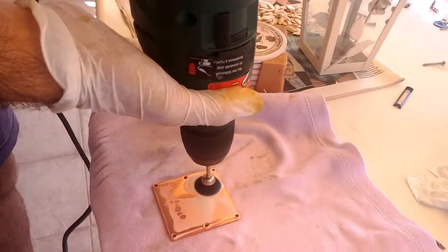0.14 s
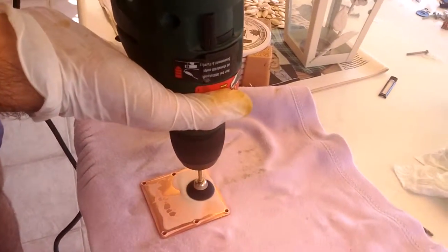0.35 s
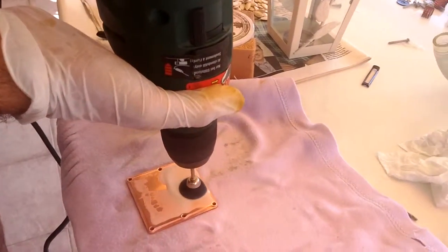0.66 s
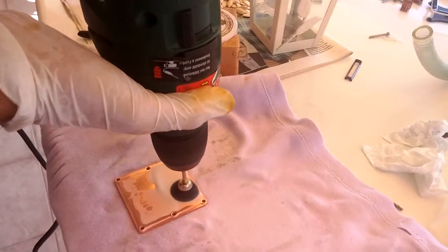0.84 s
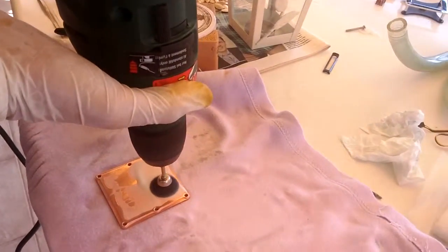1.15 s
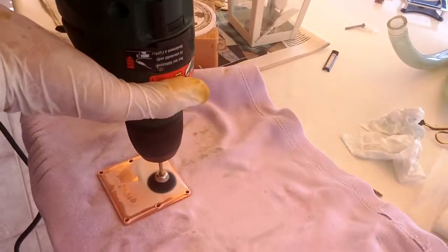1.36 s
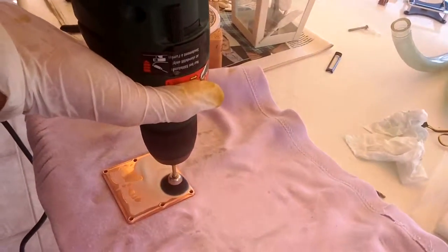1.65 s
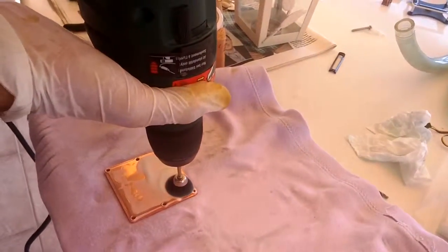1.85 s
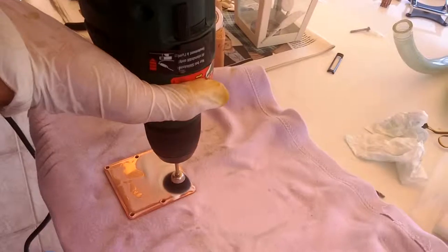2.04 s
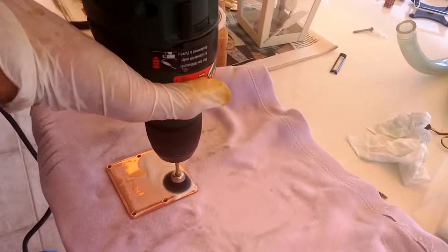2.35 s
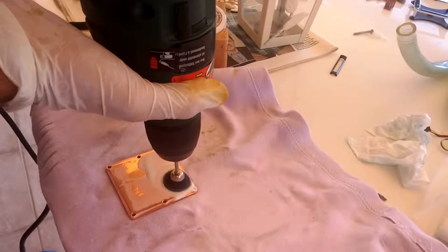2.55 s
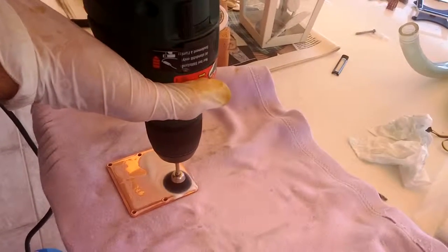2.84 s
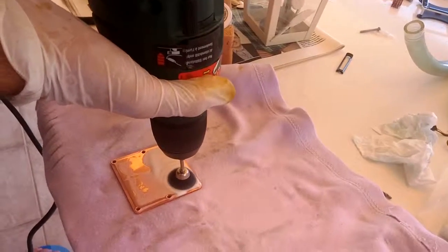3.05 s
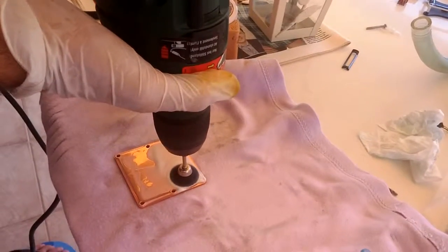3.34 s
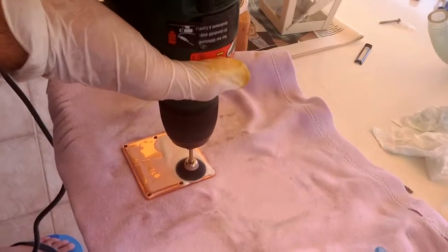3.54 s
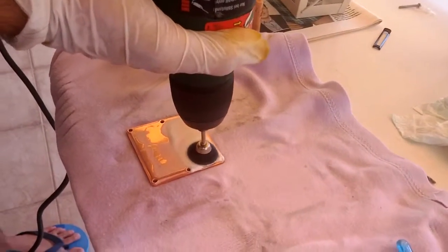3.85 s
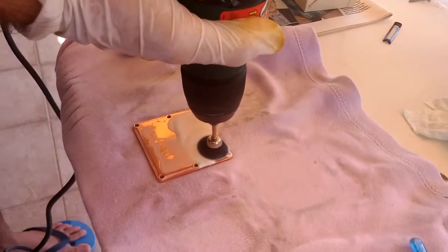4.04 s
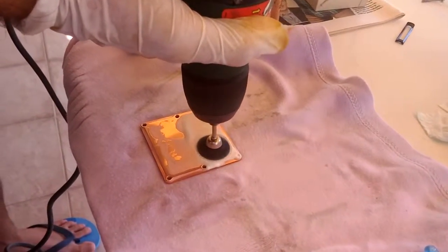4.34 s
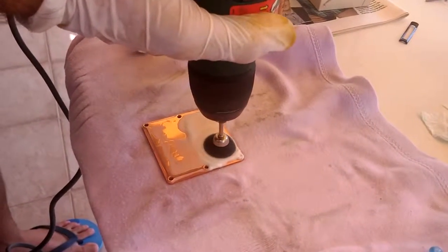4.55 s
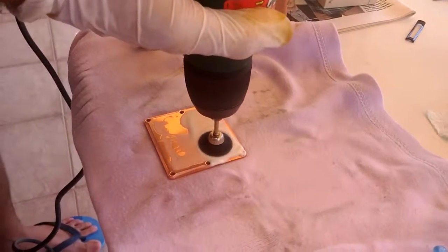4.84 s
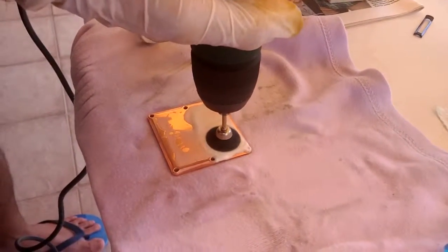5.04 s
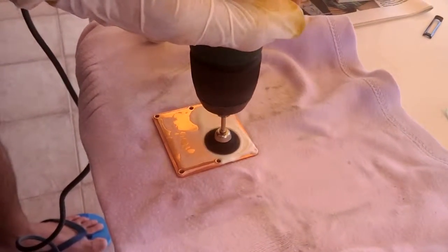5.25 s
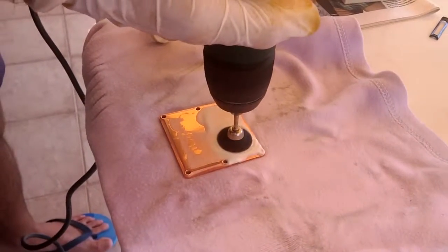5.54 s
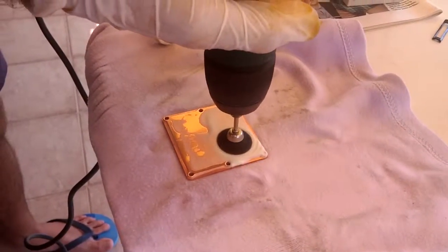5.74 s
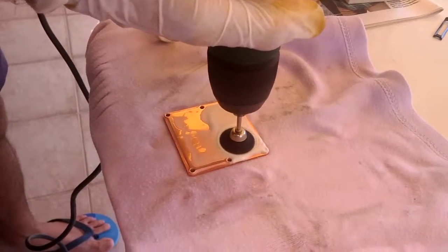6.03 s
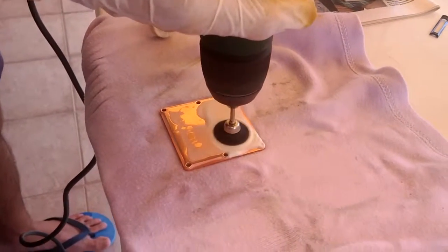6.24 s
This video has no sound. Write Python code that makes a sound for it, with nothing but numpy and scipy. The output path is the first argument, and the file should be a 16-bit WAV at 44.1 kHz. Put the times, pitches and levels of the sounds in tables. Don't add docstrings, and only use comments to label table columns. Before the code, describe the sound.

A corded drill grinds a metal plate close up, loud, then softer, then loud again, over hissing motor air, low thuds and a rising whistle.

```python
import sys
import numpy as np
from scipy import signal
from scipy.fft import rfft, irfft, next_fast_len
from scipy.io import wavfile
from scipy.ndimage import uniform_filter1d, map_coordinates

SR = 44100
rng = np.random.default_rng(int(sys.argv[2]) if len(sys.argv) > 2 else 0)


def convert_level_to_amplitude(level_db):
    exponent = np.asarray(level_db, float) / 20
    return 10 ** exponent


def generate_wav(sig):
    pcm = np.round(np.clip(np.atleast_2d(sig).T, -1, 1) * 32767).astype(np.int16)
    wavfile.write(sys.argv[1], SR, pcm)


N = 281799
HZ = np.fft.rfftfreq(next_fast_len(N + 8192), 1 / SR)

# (time [s], grinding [dB], fan hiss [dB], mains hum [dB], table thud [dB])
WORK_LEVELS = [(0.0, -12, -29, -50.5, -36), (0.03, -12, -31, -50, -52), (0.16, -11.5, -30.5, -59, -51),
               (0.19, -13, -30, -53, -45), (0.25, -12.5, -30, -61, -52), (0.37, -12, -30, -53, -52),
               (0.59, -12, -30, -67, -46), (0.64, -12, -30, -60, -51), (0.82, -11, -30.5, -59, -45),
               (0.93, -15.5, -30.5, -59, -55), (1.1, -24, -31.5, -61, -55), (1.39, -23.5, -31.5, -59, -51),
               (1.44, -25, -32, -74, -52), (1.55, -23.5, -31, -52, -54), (1.6, -23.5, -28.5, -70, -55),
               (1.65, -21, -29, -56, -53), (2.01, -19.5, -26.5, -45, -49), (2.08, -20, -25.5, -58, -48),
               (2.17, -18.5, -26, -52, -41), (2.3, -19, -26, -50, -48), (2.49, -15.5, -24.5, -41, -46),
               (2.54, -15, -25, -51, -47), (2.6, -16, -25, -44, -43), (2.92, -15, -25, -44, -43.5),
               (3.22, -15.5, -24, -61, -40.5), (3.27, -16, -25, -46, -44), (3.44, -15, -24.5, -52, -43),
               (3.52, -15, -24.5, -44, -42), (3.61, -15, -24.5, -51, -51), (3.67, -15.5, -24, -41, -44),
               (3.72, -15, -24, -51, -43), (3.83, -14, -24.5, -57, -42), (4.04, -11.5, -24, -46, -45.5),
               (4.13, -12, -24.5, -54, -40), (4.18, -13, -23, -51, -33), (4.22, -12, -24.5, -47, -35),
               (4.36, -12, -24, -50, -43), (4.48, -12, -24.5, -50, -38), (4.52, -13, -22.5, -53, -37),
               (4.55, -12.5, -24.5, -49, -42), (4.66, -12, -24, -54.5, -43), (4.96, -11, -23.5, -49, -34.5),
               (5.07, -10, -23.5, -40, -44), (5.18, -12, -24, -58, -38), (5.23, -11, -23, -64, -37),
               (5.29, -10.5, -23.5, -53, -39), (5.36, -11, -23.5, -55, -48), (5.39, -10.5, -24, -50, -39),
               (5.48, -12, -25, -42, -41), (5.52, -11, -25.5, -54, -42), (5.62, -12, -25.5, -56, -43),
               (5.66, -12, -26, -64, -40), (5.84, -11, -26, -48, -46), (5.89, -12.5, -26, -51, -44),
               (6.03, -12.5, -26.5, -47, -40), (6.12, -12.5, -26, -61, -43), (6.18, -10.5, -26, -41, -42),
               (6.25, -12.5, -26, -50, -46), (6.3, -12.5, -26.5, -64, -42), (6.34, -12, -26.5, -51, -37),
               (6.39, -12.5, -26, -52, -42)]
# (time [s], place [0 corner, 1 middle, 2 pressed, 3 far edge], housing turned away [0-1])
DISC_PLACE = [(0, 0, 0.81), (.85, 0, 0.28), (1.1, 0.45, 0), (1.8, 1, 0.068), (3.7, 1.2, 0.21),
              (4.0, 2.5, 0.49), (4.9, 2.5, 0.48), (5.3, 3, 0.66), (5.7, 3, 1), (6.39, 3, 0.92)]


def spectrum(x):
    return rfft(x, 2 * len(HZ) - 2)


def waveform(bins):
    return irfft(bins)[..., :N]


def unit(x):
    mono = np.atleast_2d(x).mean(axis=0)
    return x / np.sqrt(np.mean(mono ** 2))


def along(rows):
    f, *cols = np.transpose(rows)
    return np.array([np.interp(np.log(HZ + 1), np.log(f + 1), c) for c in cols])


def curves(rows):
    s, *cols = np.transpose(rows)
    return [np.interp(np.arange(N) / SR, s, c) for c in cols]


def wobble(rate_hz):
    knots = rng.standard_normal(int(N * rate_hz / SR) + 4)
    return map_coordinates(knots, [np.arange(N) * rate_hz / SR])


def port_noise(patchy_db):
    # (frequency [Hz], likeness [0-1], lead of the right port [rad])
    ports = [(60, 0.84, 0.01), (250, 0.9, -0.5), (470, 0.8, -0.9), (870, 1, 0.85), (1244, 0.62, -1.5),
             (1560, 0.92, 0.6), (1970, 0.8, 1.0), (2800, 0.81, 3.5), (3540, 0.31, 3.0), (4240, 0.53, 3),
             (4800, .15, 4.5), (5640, 0.55, 5.5), (8540, 0.27, 4), (11100, 0.13, 6), (15500, 0.5, 0.5)]
    z = signal.stft(rng.standard_normal((2, N)), nperseg=512)[2]
    field = rng.standard_normal(z.shape[1:])
    field = uniform_filter1d(field, size=4, axis=0)
    field = uniform_filter1d(field, size=6, axis=1)
    patchy = z * convert_level_to_amplitude(patchy_db * field / field.std())
    a, b = spectrum(signal.istft(patchy, nperseg=512)[1][:, :N])
    alike, lead_rad = along(ports)
    turn = np.arccos(np.clip(alike, 0, 1)) / 2
    mid, side = np.cos(turn) * a, np.sin(turn) * b
    left = (mid + side) * np.exp(-0.5j * lead_rad)
    right = (mid - side) * np.exp(0.5j * lead_rad)
    return np.array([left, right])


def morph(noise, colours, edge, place):
    voices = [unit(waveform(noise * convert_level_to_amplitude(along(c)) * edge)) for c in colours]
    return sum(np.clip(1 - abs(place - k), 0, 1) * v for k, v in enumerate(voices))


def plate():
    # (frequency [Hz], left [dB], right [dB])
    corner = [(90, -34, -43), (330, -24.5, -34), (714, -22, -28), (847, -16, -21.5), (1056, -6.5, -6),
              (1270, 0.5, -10), (1700, -3, -14), (2070, -9.5, -12.5), (2440, -10, -20), (2660, -14, -19),
              (3300, -24.5, -18.5), (3830, -26, -25), (4750, -31, -19.5), (6100, -18.5, -19)]
    # (frequency [Hz], left [dB], right [dB])
    middle = [(90, -26, -22), (320, -16.5, -22), (746, -11, -20.5), (850, -8, -15.5), (1014, -0.5, -4),
              (1460, -2, -15), (1700, 0, 0), (2050, -0.5, -10), (2330, -3, -16), (2680, -10, -8),
              (3080, -15.5, -17), (4070, -23, -17.5), (4750, -16.5, -19.5), (6000, -16.5, -20)]
    # (frequency [Hz], left [dB], right [dB])
    pressed = [(90, -18, -23), (318, -19, -17), (690, -12, -21), (840, -9.5, -14.5), (1070, -1.5, -4.5),
               (1450, -8.5, -17), (1700, -0.5, 0.5), (1990, -2, -12), (2370, -12, -13), (2700, -12.5, -9.5),
               (3120, -25, -16), (4200, -24, -24), (4600, -33, -24), (6000, -25, -20)]
    # (frequency [Hz], left [dB], right [dB])
    far_edge = [(90, -23, -34), (324, -22, -28.5), (756, -16.5, -24), (838, -8, -14.5), (1100, -10, -18.5),
                (1370, -16.5, -13.5), (1700, 1.5, -3), (1990, -1, -13), (2350, -10.5, -8.5),
                (2670, -9, -18.5), (3170, -26, -17.5), (3950, -23, -17), (4600, -25, -20),
                (6000, -16.5, -19)]
    place = np.clip(curves(DISC_PLACE)[0], 0, 3)
    low_pass = 1 / (1 + (HZ / 5800) ** 8)
    high_pass = 1 / (1 + (270 / (HZ + 1)) ** 6)
    bite_db = curves(WORK_LEVELS)[0] - 0.7 + 0.21 * wobble(26)
    colours = [corner, middle, pressed, far_edge]
    return convert_level_to_amplitude(bite_db) * morph(port_noise(patchy_db=1.2), colours, low_pass * high_pass, place)


def fan():
    # (frequency [Hz], left [dB], right [dB])
    facing = [(4750, -9, -11), (5400, -12.5, -10.5), (6500, -2.5, -9.5), (7050, -3.5, -3), (8500, -5, -2),
              (8700, 0.5, -1.5), (9300, -4, -0.5), (10350, -6, -10), (11670, -14.5, -12), (12700, -10, -15),
              (13200, -19, -19), (14500, -12, -15), (15500, -14.5, -15)]
    # (frequency [Hz], left [dB], right [dB])
    turned = [(4750, -3, -9), (5400, -12.5, -7), (6200, -6.5, -4.5), (7140, 0.5, 1.5), (8300, -13, 0),
              (8700, -5, -2.5), (9300, -11, -5), (10300, -10.5, -8.5), (11500, -17, -11), (12600, -20, -19),
              (13200, -18, -15), (14200, -22, -16), (15500, -12.5, -14)]
    high_pass = 1 / (1 + (4900 / (HZ + 1)) ** 8)
    away = np.clip(curves(DISC_PLACE)[1], 0, 1)
    air_db = curves(WORK_LEVELS)[1] + 0.25 * wobble(30)
    return convert_level_to_amplitude(air_db) * morph(port_noise(patchy_db=0.8), [facing, turned], high_pass, away)


def motor():
    # (time [s], frequency [Hz], level [dB], left-right difference [dB])
    blade_whistle = [(0, 12980, -51, -1), (.2, 13270, -46, -2), (.45, 13490, -42, -4), (.7, 13580, -45, 1),
                     (1.0, 13650, -47, 2), (1.3, 13670, -47, 3), (1.65, 13685, -40, 4),
                     (2.0, 13680, -38, -1), (2.5, 13665, -36, -1), (3.0, 13635, -35, -1),
                     (3.55, 13625, -34, -1), (3.95, 13650, -37, 3), (4.1, 13660, -43, 0),
                     (4.5, 13685, -43, 0), (4.87, 13700, -40, 0), (4.95, 14250, -36, 0),
                     (5.05, 15050, -33, -2), (5.13, 15500, -31, -4), (5.2, 15780, -29, -4),
                     (5.4, 16350, -30, 0), (5.7, 16850, -30, 0), (6.39, 17050, -30, 0)]
    # (time [s], first-order level [dB], extra for the second order [dB])
    shaft_hum = [(0, -50, -4), (1, -51, -4), (1.4, -54, -4), (1.9, -48, -4), (3, -45, -5), (4, -44, -5),
                 (4.9, -42, -2), (5.1, -38, 5), (5.45, -40, 7), (5.8, -44, 11), (6.39, -45, 10)]
    # (multiple of shaft rate, level [dB])
    orders = [(1, -1), (2, -3), (4, 10.5), (8, 0), (9, -7)]
    blades = 39
    hz, whistle_db, pan_db = curves(blade_whistle)
    blade_turns = np.cumsum(hz * (1 + 0.00061 * wobble(40))) / SR
    slow_skirt = 0.4 * (wobble(180) + 1j * wobble(180))
    fast_skirt = 0.12 * (wobble(1100) + 1j * wobble(1100))
    apart_rad = np.array([[0], [1]]) * (1.4 + 0.35 * wobble(2.5))
    swell = convert_level_to_amplitude(1.2 * wobble(10)) + slow_skirt + fast_skirt
    whistle = np.sqrt(2) * np.real(swell * np.exp(2j * np.pi * blade_turns + 1j * apart_rad))

    hum_db, second_db = curves(shaft_hum)
    hum = np.zeros(N)
    for order, level_db in orders:
        tone_db = level_db + (order == 2) * second_db + 1.7 * wobble(5.5)
        hum += convert_level_to_amplitude(tone_db) * np.sin(2 * np.pi * order * blade_turns / blades)
    whistle_gain = convert_level_to_amplitude(whistle_db + pan_db * np.array([[0.5], [-0.5]]))
    return whistle_gain * whistle + convert_level_to_amplitude(hum_db + [[4.5], [1.5]]) * hum


def table():
    # (frequency [Hz], level [dB])
    rumble_colour = [(22, -27), (40, -16), (49, -5), (58, -6), (95, -17)]
    # (frequency [Hz], level [dB])
    thud_colour = [(60, -17), (90, -3), (160, 0), (260, 1), (340, -13.5), (500, -46)]
    mains_hz = 50
    noise = port_noise(patchy_db=2.0) * (HZ < 600)
    rumble = unit(waveform(noise * convert_level_to_amplitude(along([*rumble_colour, (200, -60)]))))
    thud = unit(waveform(noise * convert_level_to_amplitude(along(thud_colour))))
    buzz = np.sin(2 * np.pi * np.cumsum(mains_hz + 1.5 * wobble(6)) / SR)
    hum_db, thud_db = curves(WORK_LEVELS)[2:]
    hum = 0.72 * rumble + 0.99 * buzz
    return convert_level_to_amplitude([[1.5], [-1.5]]) * (convert_level_to_amplitude(hum_db) * hum + convert_level_to_amplitude(thud_db) * thud)


def catches():
    # (time [s], mode [Hz], level [dB], length [s])
    snags = [
        (1.635, 1700, -19, 0.0093),
        (1.685, 1700, -16, .012),
        (1.766, 1390, -19, .012),
        (1.801, 1700, -10, 0.0076),
        (1.84, 1050, -18, 0.019),
        (2.954, 1605, -11.5, 0.048),
        (3.496, 1005, -11, 0.013),
        (4.18, 1880, -12, 0.042),
        (5.533, 1700, -12, .006),
    ]
    t = np.arange(N) / SR
    waver_rad = 1.1 * wobble(90)
    ring = np.zeros(N)
    for s, hz, db, length_s in snags:
        swell = np.exp(-((t - s) / length_s) ** 2)
        ring += convert_level_to_amplitude(db) * swell * np.sin(2 * np.pi * hz * t + waver_rad)
    return convert_level_to_amplitude([[2.5], [-2.5]]) * np.array([np.roll(ring, 5), ring])


def resonate(rush):
    # (frequency [Hz], width [Hz], left [dB], right [dB])
    rings = [(368, 30, 2, 3), (685, 60, -3.5, -1.5), (770.3, 21, 6, 9.5), (862, 29, 1.5, 1.5),
             (1568, 46, 3, 0.5), (2450, 120, .5, 2), (3030, 78, 3, 3.5), (3584, 150, 2, 2.5),
             (4200, 250, 0, -1), (4760, 200, 3.5, 1), (5650, 200, 1, 2), (6640, 290, 1.5, 0.5),
             (7260, 330, 0.5, -1.5), (8300, 330, 3.5, 1), (8560, 200, -4, -.5), (9200, 220, 2, 1.5),
             (9640, 200, 1, -4), (9900, 200, 1, 3.5), (10600, 250, -0.5, 1.5)]
    hz, width_hz, *gains_db = np.transpose(rings)[:, :, None]
    shape = 1 / (1 + ((HZ - hz) / (0.5 * width_hz)) ** 2)
    peaks = np.array([convert_level_to_amplitude(np.sum(db * shape, axis=0)) for db in gains_db])
    return waveform(spectrum(rush) * peaks)


def table_echo(rush):
    # (time [s], depth [dB])
    shadow = [(0, 3), (.9, 4), (1.1, 13), (3.7, 14), (4.1, 6), (5.2, 4), (5.5, 0), (6.39, 0)]
    band = waveform(spectrum(rush[0]) * np.exp(-((HZ - 4750) / 300) ** 2))
    lost = 1 - convert_level_to_amplitude(-curves(shadow)[0])
    return rush - np.array([[1], [0]]) * lost * band


def scene():
    rush = table_echo(resonate(plate() + fan()))
    return rush + motor() + table() + catches()


def roll_off(x):
    return signal.sosfilt(signal.butter(12, 16090, fs=SR, output="sos"), x)


def record(dry):
    ceiling, top_hz = 0.84, 15800
    rounded = dry / (1 + abs(dry / ceiling) ** 6) ** (1 / 6)
    limited = waveform(spectrum(rounded) * (HZ < top_hz))
    return roll_off(limited)


dry = scene()
out = record(dry)
generate_wav(out)
```